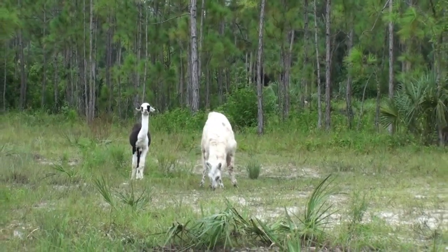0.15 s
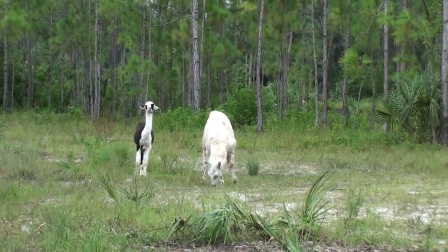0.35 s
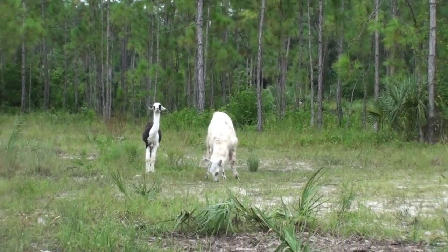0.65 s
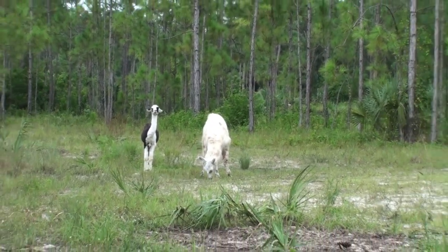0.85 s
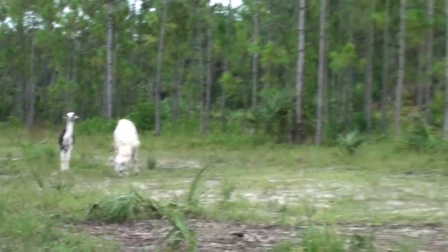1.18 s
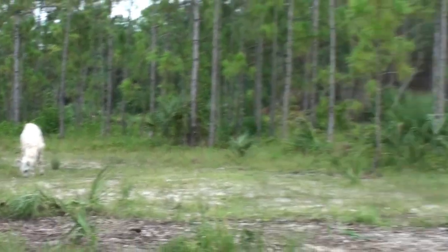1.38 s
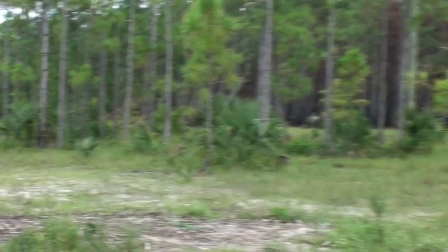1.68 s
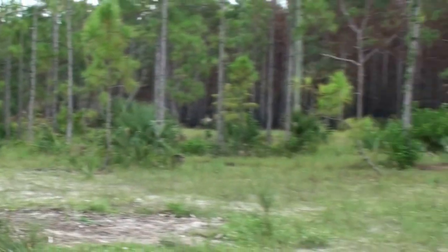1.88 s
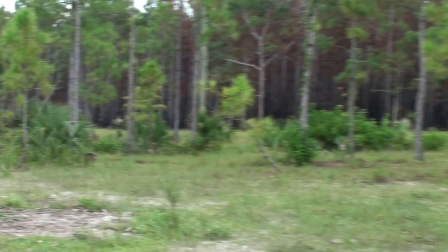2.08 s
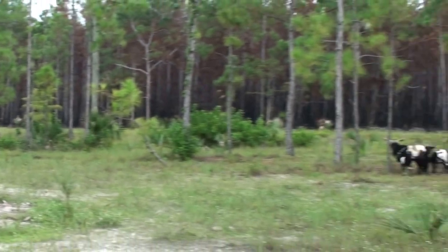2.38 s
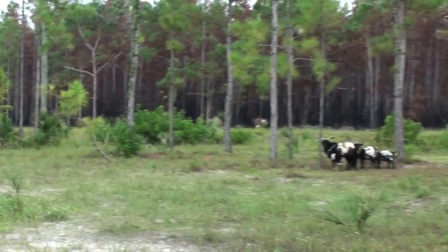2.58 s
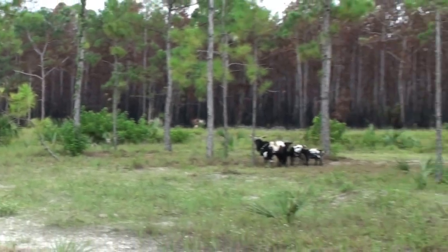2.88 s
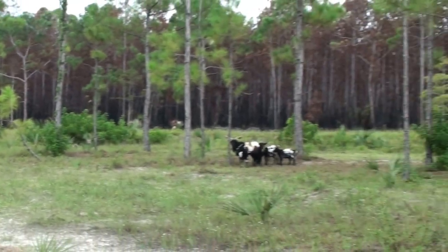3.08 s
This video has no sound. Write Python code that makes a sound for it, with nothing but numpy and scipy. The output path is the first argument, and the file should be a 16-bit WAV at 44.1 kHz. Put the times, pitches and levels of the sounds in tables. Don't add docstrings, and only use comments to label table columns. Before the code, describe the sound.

Loud, dense high-pitched cicada buzzing at a pine wood's edge, with small handling ticks on the camera

```python
import sys
import numpy as np
from scipy import signal
from scipy.fft import rfft, irfft, next_fast_len
from scipy.io import wavfile
from scipy.ndimage import map_coordinates

SR = 44100
rng = np.random.default_rng(int(sys.argv[2]) if len(sys.argv) > 2 else 0)


def to_linear_factor(level_db):
    exponent = np.asarray(level_db, float) / 20
    return 10 ** exponent


def persist_wave(psi):
    counts = np.round(np.clip(psi, -1, 1) * 32767).astype(np.int16)
    wavfile.write(sys.argv[1], SR, np.atleast_2d(counts).T)


N = 143325
T = np.arange(N) / SR

# place in the muscle cycle [0-1], ring in Hz, level in dB, T60 in s.
LOW_RIB_CLICKS = [(-.28, 10200, 0, .002), (-.151, 9350, 1, .0022), (-.022, 9400, 2, .0022),
                  (.107, 8700, -2, .002), (.236, 8600, -5, .002), (-.28, 7850, -11, .006),
                  (-.151, 7860, -8, .006), (-.022, 7850, -7, .006), (.107, 7820, -9, .005),
                  (.107, 14600, -9, .0015)]
# place in the cycle [0-1], ring in Hz, level in dB, T60 in s.
HIGH_RIB_CLICKS = [(-.18, 12120, 0, .008), (-.18, 10300, -3, .0015), (-.04, 12120, -6, .006),
                   (-.18, 13600, -6, .0015), (.12, 11500, 0, .008), (.12, 13000, -7, .0015),
                   (.35, 13600, -9, .002)]
# start in s, end in s, muscle cycles per s, cycle at time zero, level in dB.
LOW_SONGS = [(-.2, 3.4, 101.4, -.76, -39.5)]
# start in s, end in s, muscle cycles per s, cycle at time zero, level in dB.
HIGH_SONGS = [
    (-.2, .54, 97.4, -.37, -41),
    (.7, 3.4, 98.5, -.42, -43),
]
# time in s, gain in dB.
LOW_EFFORT = [(0, -13), (.5, -0.5), (1, 0.5), (1.9, 2), (2.1, 0.5), (2.85, 0.5), (3.25, -0.5)]
# frequency in Hz, density in dB per Hz.
CHORUS_SPECTRUM = [(4500, -54.5), (5800, -28), (6200, -24.5), (7300, -10.5), (9370, 1), (11000, -3.5),
                   (13000, -6.5), (16000, -19)]
# time in s, left over right in dB, chorus level in dB.
CAMERA_TURN = [(0.0, 4, -32.5), (0.03, 6.5, -31.5), (0.23, 7, -33.5), (1.14, 5.5, -33.5),
               (1.17, 6.5, -35.5), (3.07, 1, -33), (3.25, 2.0, -34)]
# frequency in Hz, left-right likeness [0-1].
CICADA_LIKENESS = [(6000, 0.98), (7300, 1), (7800, 1), (8400, 1), (9500, 1), (11200, 1), (11600, 1),
                   (16000, .998)]
# frequency in Hz, left lead in radians.
CICADA_LEAD = [(6000, 1.04), (7700, 0.3), (8800, 0.92), (11100, 1.3), (11500, -0.47), (16000, 0.44)]
# frequency in Hz, T60 in s.
TRUNK_DECAY = [(1000, 1.2), (4000, 1.8), (12000, 0.21)]
# time in s, peak in dB, left over right in dB.
FINGER_TICKS = [(.155, -52, -1.5), (0.3262, -27, 1.5), (.373, -48, 2), (0.3912, -36.5, .5),
                (1.1705, -43, -3), (1.1805, -49, -2.5), (1.2257, -37, -6), (1.373, -52, -1),
                (1.721, -43.5, -6), (2.79, -39.5, -5.5), (2.929, -51, -4), (3.048, -46, -3),
                (3.168, -50, -4)]
TICK_DULLNESS = [.05, 0.036, .05, 0.076, 0.098, .02, 0.29, 0.33, 0.54, 0.072, 0.45, 0.022, 0.51]
TICK_SNAP_HZ = [1220, 1300, 1900, 1200, 550, 1000, 2800, 600, 900, 920, 650, 1600, 500]
# frequency in Hz, level in dB, T60 in s.
SHELL_MODES = [(720, -2, .03), (960, -6, .022), (1300, -6, .018), (1620, 0, .02), (2100, -2, .014),
               (2700, -5, .01)]
# time in s, fourth partial in Hz, its level in dB.
BIRD_NOTE = [(1.634, 3066, -71), (1.647, 3304, -53.5), (1.668, 3390, -61), (1.715, 3350, -56.5),
             (1.721, 3360, -58), (1.784, 3243, -47.5), (1.871, 3072, -54), (1.881, 3080, -59),
             (1.89, 2980, -57)]
# multiple, level in dB, change in dB per s, share of the swell [0-1].
BIRD_PARTIALS = [(2, -80, 40, .2), (3, -65, -30, .2), (4, -55, 0, 1), (5, -95, 80, .2), (6, -65, -90, .5)]
# frequency in Hz, density in dB per Hz.
AIR_SPECTRUM = [(20, -2), (60, -1), (120, -2.5), (300, -6.5), (800, -12), (2300, -16), (3000, -18.5),
                (5600, -23)]
# frequency in Hz, left-right likeness [0-1].
AIR_LIKENESS = [(60, 0.96), (130, 1), (290, 0.9), (640, 0.12), (1410, 0.21), (3100, 0.1), (6820, 0.21),
                (15000, 1)]
# time in s, gain in dB.
LEAF_RUSTLE = [(0, -1), (.3, -3), (.45, 1), (.8, -0.5), (1.1, 0.5), (1.4, 0), (2, .5), (2.6, 1), (3.25, 1)]
# time in s, half length in s, level in dB.
WIND_PUFFS = [(0.217, 0.11, -62), (0.534, 0.078, -52.5), (0.809, 0.043, -50), (1.95, 0.036, -58),
              (2.058, 0.14, -50.5), (2.398, 0.059, -52.5), (2.68, 0.039, -68)]
# frequency in Hz, density in dB per Hz.
PUFF_SPECTRUM = [(20, 6), (50, 0.5), (100, 2), (250, -28), (600, -65)]


def unit(x):
    return x / np.sqrt(np.mean(x ** 2) + 1e-20)


def along(points, hz):
    f, value = np.transpose(points)
    return np.interp(np.log(hz + 1), np.log(f + 1), value)


def over_time(points):
    return np.interp(T, *np.transpose(points))


def wobble(rate):
    return map_coordinates(rng.standard_normal(N // 16), [T * rate])


def filtered(x, response):
    m = next_fast_len(N + 8192)
    return irfft(rfft(x, m) * response(np.fft.rfftfreq(m, 1 / SR)), m)[..., :N]


def pair(shared, diffuse, alike, lead):
    def turn(hz):
        return np.arccos(np.clip(along(alike, hz), -1, 1)) / 2

    def port_phase(hz):
        return np.exp(.5j * along(lead, hz) * np.array([[1], [-1]]))

    mid, side = filtered(np.array([shared, diffuse]), lambda hz: [np.cos(turn(hz)), np.sin(turn(hz))])
    return filtered(np.array([mid + side, mid - side]), port_phase)


def panned(x, db):
    return x * np.array([to_linear_factor(db / 2), to_linear_factor(-db / 2)]).reshape(2, -1)


def echoes(x):
    hz, t, z = signal.stft(rng.standard_normal((2, SR)), SR, nperseg=256)
    decay = to_linear_factor(-60 * t / along(TRUNK_DECAY, hz)[:, None])
    tail = signal.istft(z * decay, SR, nperseg=256)[1]
    wet = signal.fftconvolve(x[None], tail, axes=1)[:, :N]
    return unit(wet) * np.sqrt(np.mean(x ** 2))


def drum(ribs, rate, offset):
    cycle_jitter_s, rib_jitter_s, pitch_scatter, size_db, attack_s = .0002, .00003, .005, 2.4, 0.000078
    place, hz, db, t60 = np.transpose(ribs)
    drift = 0.03895 * wobble(2.8)
    beat = (np.arange(N // 400) + 1 - offset % 1) / rate
    beat = beat + drift[np.clip(beat * SR, 0, N - 1).astype(int)] / rate
    chance = rng.standard_normal((4, len(beat), len(place)))
    start = beat[:, None] + place / rate + cycle_jitter_s * chance[0, :, :1] + rib_jitter_s * chance[1]
    sample = np.ceil(start * SR)[..., None] + np.arange(192)
    t = sample / SR - start[..., None]
    pitch = (hz * (1 + pitch_scatter * chance[2]))[..., None]
    ring = np.sin(2 * np.pi * pitch * t) * (1 - np.exp(-t / attack_s))
    ring = ring * to_linear_factor((db + size_db * chance[3])[..., None] - 60 * t / t60[:, None])
    return unit(np.bincount(sample.astype(int).ravel(), ring.ravel(), N)[:N])


def songs(ribs, rows):
    swell_s, stop_s = 0.38, 0.0073
    total = 0
    for start, end, rate, offset, db in rows:
        swell = np.clip((T - start) / swell_s + (start < 0), 0, 1)
        stop = np.clip((end - T) / stop_s, 0, 1)
        total = total + to_linear_factor(db + 0.57 * wobble(3.33)) * swell * stop * drum(ribs, rate, offset)
    return total


def near_cicadas():
    low = to_linear_factor(over_time(LOW_EFFORT)) * songs(LOW_RIB_CLICKS, LOW_SONGS)
    both = low + songs(HIGH_RIB_CLICKS, HIGH_SONGS)
    return filtered(both, lambda hz: 1 / (1 + (7300 / (hz + 1)) ** 14))


def far_chorus(count):
    rate = rng.uniform(96, 104, (count, 1))
    offset = rng.random((count, 1))
    strength = to_linear_factor(1.3 * np.array([wobble(5.7) for _ in range(count)]))
    power = np.sum(np.cos(np.pi * (rate * T + offset)) ** 2 * strength, 0)
    grit = rng.standard_normal(N) * to_linear_factor(1.03 * wobble(1500))
    return unit(filtered(np.sqrt(power) * grit, lambda hz: to_linear_factor(along(CHORUS_SPECTRUM, hz))))


def cicadas():
    wood_db, chorus_gain_db = -7, -2.5
    joined_hz, joined_pan = 11200, 0.62
    s, pan_db, chorus_db = np.transpose(CAMERA_TURN)
    pan_db = np.interp(T, s, pan_db)
    level = to_linear_factor(np.interp(T, s, chorus_db) + chorus_gain_db + 0.16 * wobble(6.4))
    close = near_cicadas()
    wet = to_linear_factor(wood_db) * echoes(close)
    shared = close + wet[0] + level * far_chorus(count=16)
    diffuse = 4.0 * wet[1] + 5.7 * level * far_chorus(count=16)
    both = pair(shared, diffuse, CICADA_LIKENESS, CICADA_LEAD)
    high = filtered(both, lambda hz: hz > joined_hz)
    return panned(both - high, pan_db) + panned(high, joined_pan * pan_db)


def ticks():
    contact_s, spike_s, spike_db = .0003, .00009, 4
    crack_t60_s, crack_db, snap_octaves = .012, -2, .85
    knock_hz, knock_t60_s = 490, 0.04
    port_phase = .6 * np.array([[1], [-1]])
    out = np.zeros((2, N + SR))
    t = np.arange(2048) / SR
    bins = np.fft.rfftfreq(2048, 1 / SR) + 1
    for (s, db, pan_db), dull, snap_hz in zip(FINGER_TICKS, np.clip(TICK_DULLNESS, 0, 1), TICK_SNAP_HZ):
        def colour(f):
            return np.exp(-.5 * (np.log2(f / snap_hz) / snap_octaves) ** 2)

        ring = 0
        for k, (f, mode_db, t60) in enumerate(SHELL_MODES):
            phase = 2 * np.pi * f * rng.normal(1, 0.012) * t + (-1) ** k * port_phase
            ring = ring + colour(f) * to_linear_factor(mode_db - 60 * t / t60) * np.sin(phase)
        noise = unit(irfft(rfft(rng.standard_normal((2, len(t)))) * colour(bins)))
        crack = to_linear_factor(crack_db - 60 * t / crack_t60_s) * noise
        u = (t - 2 * contact_s) / (spike_s * 1300 / snap_hz)
        spike = to_linear_factor(spike_db) * (1 - u ** 2) * np.exp(-.5 * u ** 2)
        knock = to_linear_factor(-60 * t / knock_t60_s) * np.sin(2 * np.pi * knock_hz * t)
        hit = (1 - dull) * 0.55 * (ring + crack + spike) + dull * knock
        hit = hit * (1 - np.exp(-t / contact_s))
        out[:, round(s * SR):][:, :len(t)] += panned(to_linear_factor(db + 3.5) * hit, pan_db)
    return out[:, :N]


def bird():
    pan_db, echo_db = 5, -7
    rasp_hz, rasp_depth, roughness = 150, .3, .18
    s, hz, db = np.transpose(BIRD_NOTE)
    pitch = np.interp(T, s, hz) / 4 * (1 + 0.0043 * wobble(120))
    phase = 2 * np.pi * np.cumsum(pitch) / SR
    gate = to_linear_factor(np.interp(T, [s[0] - .01, s[0], s[-1], s[-1] + .01], [-80, 0, 0, -80]))
    swell_db = np.interp(T, s, db) - BIRD_PARTIALS[2][1]
    rasp = 1 + roughness * wobble(120) + rasp_depth * np.sin(2 * np.pi * rasp_hz * T + wobble(30.25))
    note = 0
    for multiple, level_db, slope, share in BIRD_PARTIALS:
        partial_db = level_db + slope * np.clip(T - s[0], 0, .3) + share * swell_db
        note = note + to_linear_factor(partial_db) * rasp * np.sin(round(multiple) * phase)
    call = np.sqrt(2) * gate * note
    return panned(call, pan_db) + to_linear_factor(echo_db) * echoes(call)


def noise_pair(spectrum, alike, lead):
    noise = filtered(rng.standard_normal((2, N)), lambda hz: to_linear_factor(along(spectrum, hz)))
    return unit(pair(*noise, alike, lead))


def wind():
    gust = sum(to_linear_factor(db) * np.exp(-((T - s) / half_s) ** 2) for s, half_s, db in WIND_PUFFS)
    return gust * to_linear_factor(4.9 * wobble(25.13)) * noise_pair(PUFF_SPECTRUM, [(50, 0.4)], [(50, 0)])


def air():
    hiss = noise_pair([*AIR_SPECTRUM, (9000, -43)], AIR_LIKENESS, [(100, 0), (2000, 0.71)])
    floor = to_linear_factor(-56 + 0.7 * wobble(5.29)) * hiss
    leaves = filtered(floor, lambda hz: 1 / (1 + (1200 / (hz + 1)) ** 4))
    return panned(floor + (to_linear_factor(over_time(LEAF_RUSTLE)) - 1) * leaves, -1)


def scene():
    return cicadas() + ticks() + bird() + wind() + air()


def top_cut(x):
    return signal.sosfilt(signal.butter(12, 16390, fs=SR, output="sos"), x)


def record(dry):
    mix = filtered(dry, lambda hz: (hz < 15740) * hz ** 2 / (hz ** 2 + 25 ** 2))
    return top_cut(mix)


dry = scene()
out = record(dry)
persist_wave(out)
```